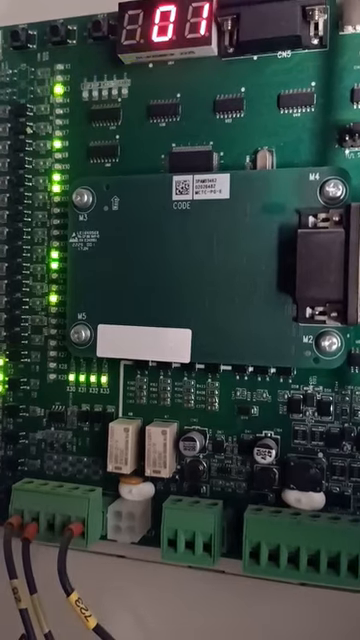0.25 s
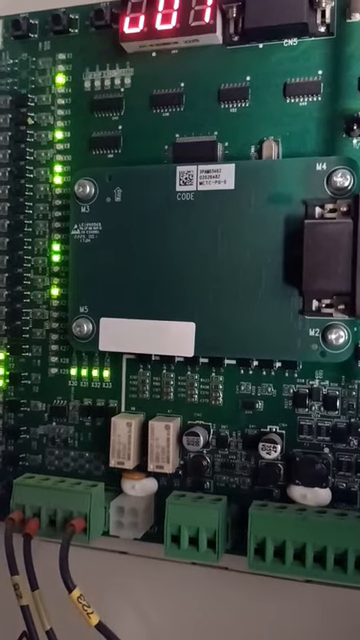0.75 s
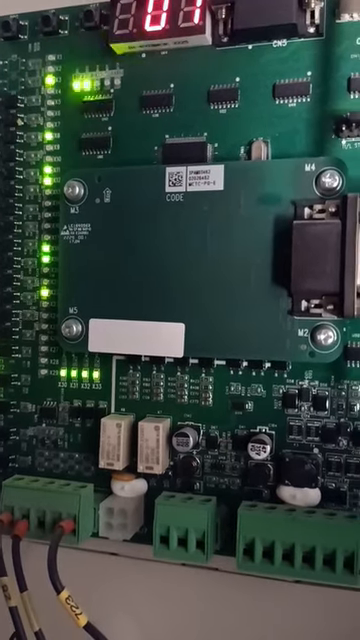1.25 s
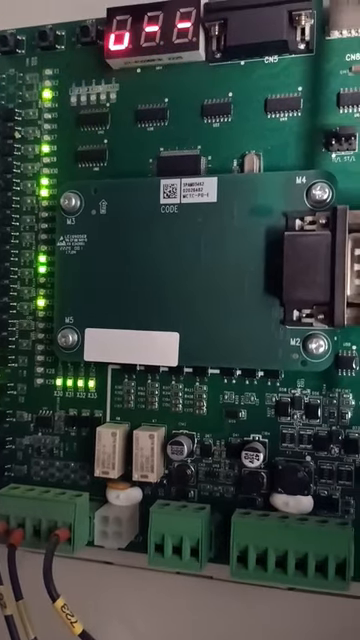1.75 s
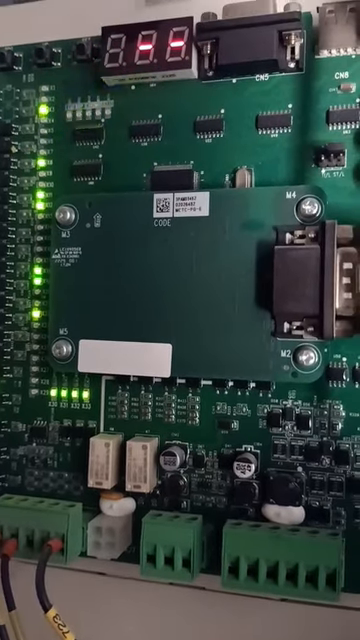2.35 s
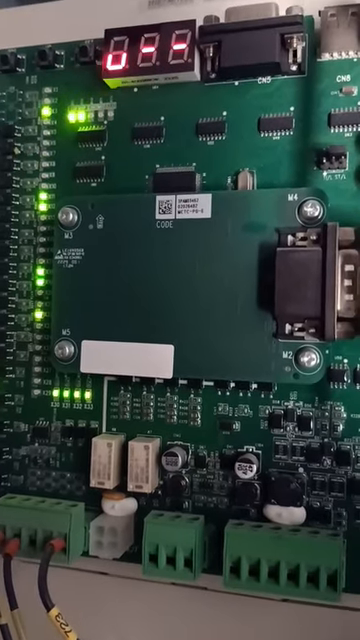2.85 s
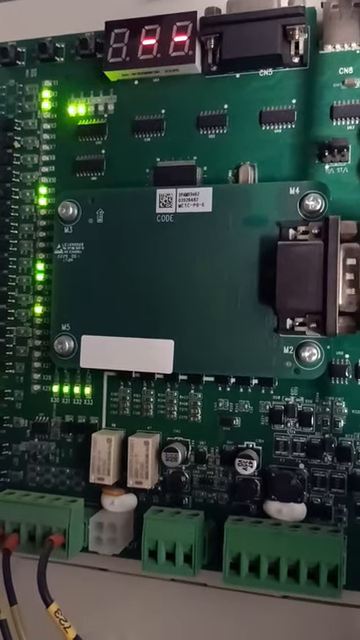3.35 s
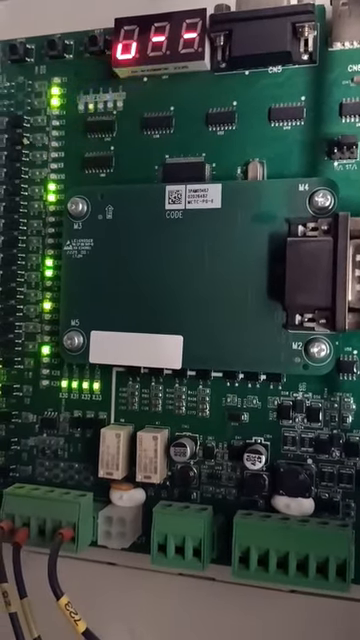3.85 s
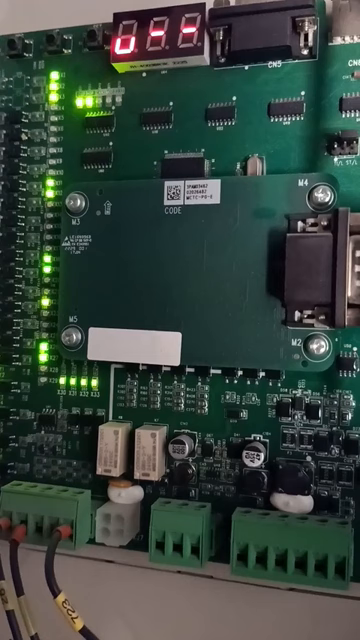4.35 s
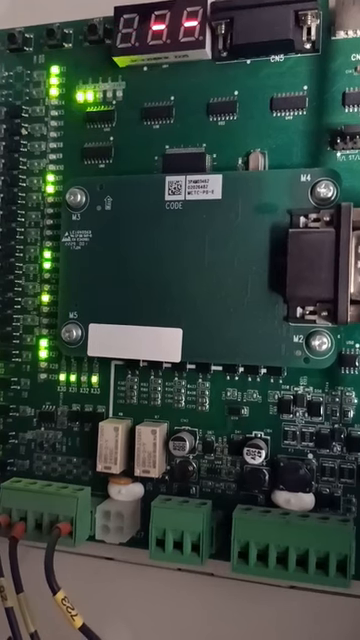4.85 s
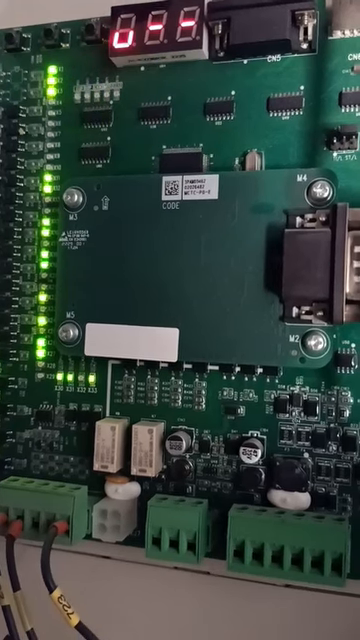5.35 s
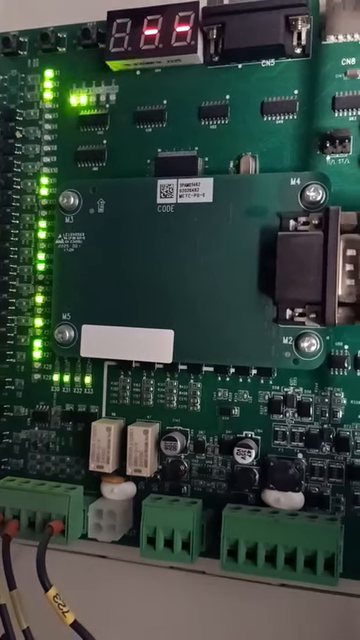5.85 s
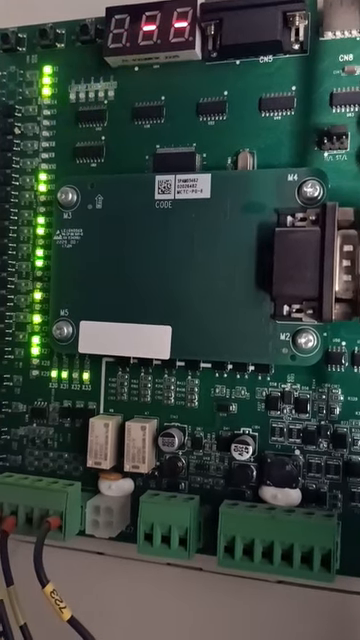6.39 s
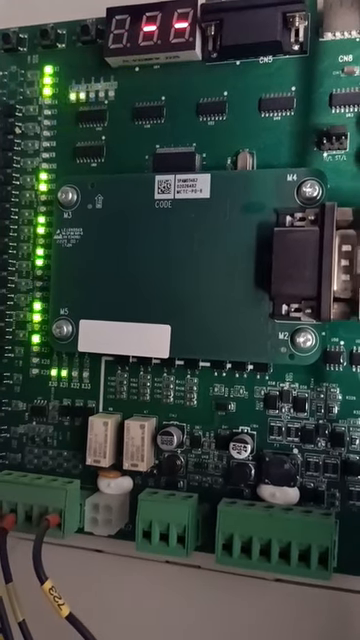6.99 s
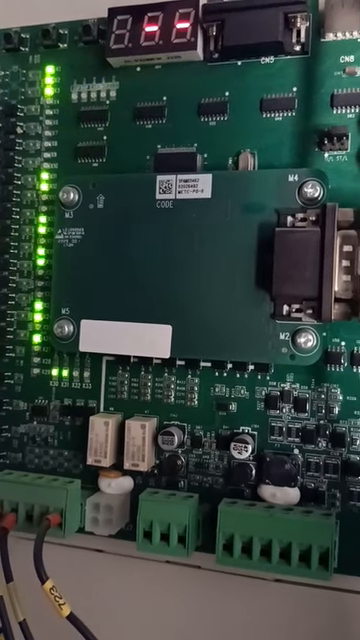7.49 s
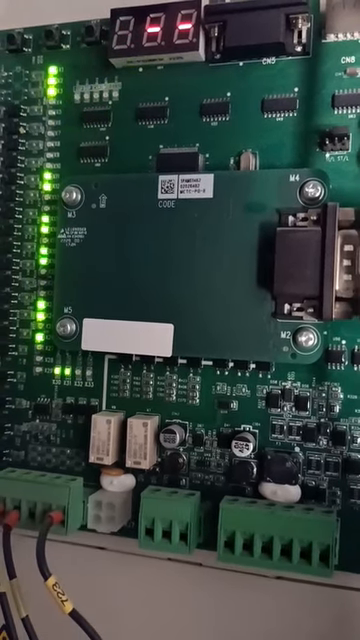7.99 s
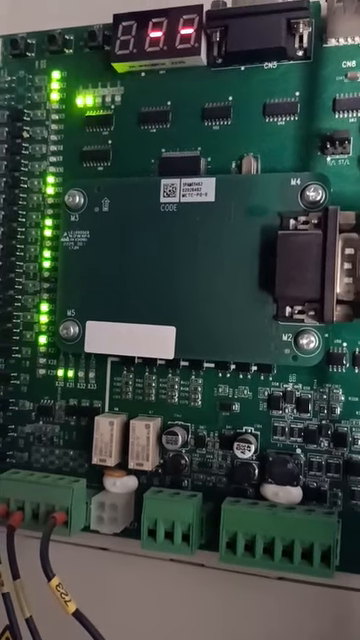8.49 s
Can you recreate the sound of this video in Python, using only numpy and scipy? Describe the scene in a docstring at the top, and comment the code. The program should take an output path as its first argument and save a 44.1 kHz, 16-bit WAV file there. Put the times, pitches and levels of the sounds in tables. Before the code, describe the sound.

Steady cabinet fan noise with a thin high whine and sinking motor hum, faint relay ticks, a sharp double snap with dull clatter, then a heavy metallic clack.

```python
"""A small machine room, close to an open lift controller: fans hum while the inverter whines and the motor stops.
Noise and wavering sines make the fans; sines that follow the motor speed make the whine and the sinking hum.
Relays tick, contactors snap and thud, the brake drops with a dull clatter and the main contactor clacks open after
the drive switches off: noise bursts shaped by a body, plus decaying modes. Rumble, bumps, squeaks and groans lie below."""
import sys
import numpy as np
from scipy import signal
from scipy.fft import rfft, irfft
from scipy.io import wavfile
from scipy.ndimage import uniform_filter1d

SR = 44100
rng = np.random.default_rng(int(sys.argv[2]) if len(sys.argv) > 2 else 0)


def unload_wav(signal):
    """Save mono or channel-first audio to the path in sys.argv[1] as 16-bit WAV at rate SR, clipped to [-1, 1]."""
    wavfile.write(
        sys.argv[1],
        SR,
        np.round(np.clip(np.atleast_2d(signal).T, -1, 1) * 32767).astype(np.int16),
    )


N = 384993
TIME = np.arange(N) / SR
AFTER = TIME[:SR]  # one second after a blow


def undb(db):
    """Decibels to gain."""
    return 10 ** (np.asarray(db) / 20)


def unit(x):
    """Scale to rms 1."""
    return x / np.sqrt(np.mean(x ** 2))


def along(points, hz):
    """Read (frequency [Hz], value) points on a log-frequency axis."""
    f, value = np.transpose(points)
    return np.interp(np.log(hz + 1), np.log(f), value)


def resonances(peaks, hz):
    """Summed bell-shaped boosts, in dB, of (centre [Hz], width [Hz], level [dB]) peaks."""
    return sum(gain_db * np.exp(-2 * ((hz - f) / width) ** 2) for f, width, gain_db in peaks)


def walk(rate):
    """Smooth random wander with a spread near 1, from `rate` fresh values a second."""
    k = int(SR / rate)
    steps = np.repeat(rng.standard_normal(N // k + 1), k)
    smooth = uniform_filter1d(uniform_filter1d(steps, k), k)
    return 1.3 * smooth[:N]


def sides_db(pan_db):
    """Left and right levels in dB; `pan_db` is left minus right."""
    return np.array([[pan_db], [-pan_db]]) / 2


def tone(hz, db, lead=0., pan_db=0.):
    """A sine of given rms whose left side leads the right by `lead` radians."""
    phase = 2 * np.pi * (np.cumsum(hz) / SR + rng.random())
    sides = np.array([[1], [-1]]) / 2
    return np.sqrt(2) * undb(db + pan_db * sides) * np.sin(phase + lead * sides)


def swells(rows, wander_hz, rate, lead):
    """Brief, unsteady tones that rise and fall in bell shapes."""
    out = 0
    for s, length, f, db in rows:
        bell = np.exp(-2 * ((TIME - s) / length) ** 2)
        out = out + tone(f + wander_hz * walk(rate), db, lead) * bell
    return out


def fade(t60):
    """Exponential decay that falls 60 dB in `t60` seconds."""
    return np.exp(-np.log(1000) * AFTER / t60)


def body(colour, size=2048):
    """Causal, minimum-phase response of unit energy with the given spectrum."""
    cepstrum = irfft(np.log(undb(along(colour, np.fft.rfftfreq(size, 1 / SR)))))
    cepstrum[1:size // 2] *= 2
    cepstrum[size // 2 + 1:] = 0
    response = irfft(np.exp(rfft(cepstrum)))
    return response / np.linalg.norm(response)


def blow(colour, t60, room_db, room_t60, rise_s, pan_db, alike_hz=450, damp_hz=1500, treble_t60=0.24):
    """Dense contact chatter through a body, then the room, whose treble has its own decay time."""
    hz = np.fft.rfftfreq(SR, 1 / SR)
    alike = 1 / (1 + (hz / alike_hz) ** 2)  # long waves reach both sides alike
    mid, side = rfft(rng.standard_normal((2, SR))) * np.sqrt([1 + alike, 1 - alike])
    noise = unit(irfft([mid + side, mid - side], SR))
    low = irfft(rfft(noise) / (1 + (hz / damp_hz) ** 4), SR)
    direct = fade(t60) * undb(sides_db(pan_db))
    # the room answers from all sides
    chatter = low * np.hypot(direct, undb(room_db) * fade(room_t60))
    chatter = chatter + (noise - low) * np.hypot(direct, undb(room_db) * fade(treble_t60))
    attack = 1 - np.exp(-AFTER / rise_s)
    return signal.fftconvolve(chatter * attack, body(colour)[None])[:, :SR]


def ring(hz, db, t60, rise_s, lag_s, pan_db=-7.5):
    """One mode that builds up and dies away; the left side's wave lags by `lag_s`."""
    shape = (1 - np.exp(-AFTER / rise_s)) ** 2 * fade(t60)
    wave = np.sin(2 * np.pi * hz * (AFTER - np.array([[lag_s], [0]])))
    return undb(db + sides_db(pan_db)) * shape / shape.max() * wave


def add(out, s, sound):
    """Mix a sound in at time s."""
    start = int(s * SR)
    out[:, start:start + sound.shape[1]] += sound[:, :N - start]


# how the noise reaches the two sides: (frequency [Hz], coherence [0-1], phase by which the left leads [rad])
LIKENESS = [(40, 0.5, -3), (157, 0.97, 1), (406, 1, -0.93), (570, 0.66, 0.5), (806, 1, -1.5),
            (1013, 0.22, -1.5), (1178, 0.1, 5.5), (1305, 0.19, 5), (1544, 0.47, 3), (1953, 0.56, 6),
            (2560, 0.031, 9), (3080, 0.16, 8.5), (4780, 0.084, 15.5), (6100, 0.37, 20.5)]


def stereo_noise(size):
    """White noise whose likeness and phase lead between the sides vary with frequency."""
    hz = np.fft.rfftfreq(size, 1 / SR)
    alike = np.clip(along([row[:2] for row in LIKENESS], hz), 0, 1)
    lead = along([row[::2] for row in LIKENESS], hz)
    mid, side = rfft(rng.standard_normal((2, size))) * np.sqrt([1 + alike, 1 - alike])
    return unit(irfft([(mid + side) * np.exp(1j * lead), mid - side], size))


def rush(colour, peaks=()):
    """Steady noise with a broad spectrum and a few resonances."""
    hz = np.fft.rfftfreq(N, 1 / SR)
    db = along(colour, hz) + resonances(peaks, hz)
    return unit(irfft(rfft(stereo_noise(N)) * undb(db), N))


# broad spectrum of the fan air: (frequency [Hz], level [dB])
AIR_COLOUR = [(25, -52), (60, -23.5), (110, -21.5), (200, -12), (320, -4.5), (520, -14.5), (1100, -7.5),
              (1550, -17), (2000, -16.5), (2600, -17), (4400, -25.5), (6200, -25), (7400, -35),
              (9000, -61.5), (12000, -64.5)]
# cabinet resonances in that air: (centre [Hz], width [Hz], level [dB])
CABINET = [(449, 57, 4), (594, 37, 6.5), (745, 215, 4), (854, 42, -14.5), (986, 14, 3.5), (1140, 110, 1),
           (1500, 25, 6.5), (1813, 390, 6), (2450, 96, 4.5), (3790, 230, 3)]
# blade tones: (frequency [Hz], level [dB], pitch wander [Hz], phase by which the left leads [rad], pitch sag [Hz])
FAN_TONES = [(351, -54.3, 4, -.2, 1), (614, -57, 3.5, .5, 2), (700.5, -60, 4, .2, 0),
             (1033.5, -58, 3, -1.7, 6), (1206, -59.5, 3, 2.2, 8), (1378, -62.5, 3, 1.1, 8),
             (1755, -65, 4, -1.8, 0), (2105, -66, 5, .7, 0), (2326, -67, 5, 1.5, 0)]
FAN_SAG_S = 7.05


def fans(air_db=-44, flutter_db=2.55, flutter_hz=450, blur_db=-5, blur_hz=13):
    """Air rushes through the cabinet, buffeting in the bass; turbulence blurs the blade tones, and some sag late."""
    air = rush(AIR_COLOUR, CABINET) * undb(air_db)
    bass = signal.sosfiltfilt(signal.butter(2, flutter_hz, fs=SR, output="sos"), air)
    out = air + bass * (undb(flutter_db * walk(35)) - 1)
    sagged = np.clip((TIME - FAN_SAG_S) / .2, 0, 1)
    for f, db, wander, lead, sag_hz in FAN_TONES:
        hz = f - sag_hz * sagged
        out += tone(hz + wander * walk(60), db + 3.2 * walk(28), lead)
        # a softer copy wanders wider and blurs the tone
        out += tone(hz + blur_hz * walk(50), db + blur_db + 3 * walk(40), lead)
    return out


# a thin tone that stops with the drive, then a fan overtone that sags from 2412 to 2397 Hz, in two rows:
# (start [s], end [s], frequency [Hz], level [dB], phase by which the left leads [rad])
THIN_TONES = [(0, 6.4, 2684, -62.5, -1), (0, 7.15, 2412, -63, 1.6), (7.15, 9, 2397, -60.5, -.2)]


def thin_tones():
    """Two thin, wavering sines: one stops with the drive; the other, a fan overtone, crossfades to a lower pitch."""
    out = 0
    for start, end, f, db, lead in THIN_TONES:
        present = uniform_filter1d(1. * ((TIME >= start) & (TIME < end)), size=2000)
        out = out + present * tone(f + 3.5 * walk(40), db + 2 * walk(14), lead)
    return out


CRUISE_HZ = 25.5  # electrical frequency at full speed
SLOWDOWN_START_S, SLOWDOWN_LENGTH_S = 2.6, 1.9


def speed():
    """Share of full speed: the lift cruises, then eases to rest along an S-curve."""
    progress = np.clip((TIME - SLOWDOWN_START_S) / SLOWDOWN_LENGTH_S, 0, 1)
    return (1 + np.cos(np.pi * progress)) / 2


def speed_db(power):
    """Level, relative to full speed, of a sound that follows a power of the speed."""
    return 20 * power * np.log10(speed() + 1e-6)


# switching tones: (frequency they close in on [Hz], multiple of the electrical frequency, relative level [dB])
SIDEBANDS = [(6000, -3, 1), (6000, 3, -2), (6000, -1, -13), (6000, 1, -18), (6000, 9, -16),
             (12000, -4, -23), (12000, 4, -26), (9900, -3, -36), (9900, 3, -40), (8100, 0, -36)]
# pitches the motor frame favours or dulls: (frequency [Hz], level [dB])
FRAME = [(5924, 0), (5936, -3), (5948, -11), (6000, -6), (6036, -8), (6050, 4), (6062, 3), (6077, -2)]
CARRIER_HZ = 6000
WHINE_DB, WHINE_POWER = -55, 1.2  # level at full speed, and the power of the speed it follows
# tone at twice the carrier: at full speed, and while the drive holds the motor still until it switches off
DRIVE_RUN_DB, DRIVE_HOLD_DB, DRIVE_OFF_S = -72, -87.5, 6.38


def motor(whine_pan_db=3, carrier_pan_db=-4, fizz_db=-27, fizz_hz=60, holding_db=-15, waver_db=2):
    """Sidebands close in on their centres and fade as the motor slows; a trace stays until the drive is off."""
    hz, whine_db = CRUISE_HZ * speed(), WHINE_DB + speed_db(WHINE_POWER)
    held_db = np.maximum(whine_db, WHINE_DB + holding_db)  # only the group on the carrier lasts at rest
    drive_db = DRIVE_HOLD_DB + (DRIVE_RUN_DB - DRIVE_HOLD_DB) * speed()
    drive_db = drive_db + (2.0 + waver_db * (1 - speed())) * walk(40)  # less steady at rest
    out = tone(np.full(N, 2 * CARRIER_HZ), drive_db, lead=-1.3, pan_db=carrier_pan_db)
    for centre, k, db in SIDEBANDS:
        pitch = centre + k * hz
        if centre == CARRIER_HZ:
            group_db, pan_db = held_db + along(FRAME, pitch), whine_pan_db
        else:
            group_db, pan_db = whine_db, carrier_pan_db
        out += tone(pitch, group_db + db + 0.83 * walk(11), lead=1.0, pan_db=pan_db)
    # a faint fizz surrounds the top tone
    out += tone(2 * CARRIER_HZ + fizz_hz * walk(300), whine_db + fizz_db, pan_db=carrier_pan_db)
    return out * (TIME < DRIVE_OFF_S)


# torque ripple: (multiple of the electrical frequency, relative level [dB])
RIPPLE = [(6, 0), (12, -2)]
# motor mount resonances, which swell the hum as it sinks through them: (centre [Hz], width [Hz], level [dB])
MOUNT = [(101, 43, 12.5), (200, 27, 15)]
HUM_DB, HUM_POWER = -63.5, 1.9  # level at full speed before the mount, and the power of the speed it follows


def windings(rough_db=4):
    """Torque ripple hums unsteadily and sinks in pitch and level as the motor slows."""
    out = 0
    for k, db in RIPPLE:
        hz = k * CRUISE_HZ * speed()
        unsteady_hz = hz + 7 * walk(60)
        level_db = HUM_DB + db + speed_db(HUM_POWER) + resonances(MOUNT, hz)
        out = out + tone(unsteady_hz, level_db + rough_db * walk(30.12))
    return out


# spectrum of the travel rumble: (frequency [Hz], level [dB])
RUMBLE_COLOUR = [(25, -20.5), (60, -21), (105, -3), (190, -2), (260, -3.5), (500, -1), (1500, -6),
                 (2700, -6), (4000, -28), (8000, -84)]
RUMBLE_DB, RUMBLE_POWER = -49, 0.19  # level at full speed, and the power of the speed it follows


def travel():
    """The moving lift rumbles in quick flutters and slower surges, sinking to a trace once it stands."""
    surge_db = 2 * walk(30) + 1.1 * walk(9)
    return rush(RUMBLE_COLOUR) * undb(RUMBLE_DB + speed_db(RUMBLE_POWER) + surge_db)


# soft low bumps: (time [s], level [dB], decay t60 [s])
BUMPS = [(0.569, -57, 0.17), (.76, -54, .2), (1.04, -53, .2), (5.64, -48.5, 0.18), (6.819, -54, 0.24),
         (7.48, -42.5, 0.16), (7.93, -54, 0.41), (8.0, -59, 0.28), (8.3, -50, 0.18)]
# their spectrum: (frequency [Hz], level [dB])
BUMP_COLOUR = [(25, 0), (55, 3.5), (85, 16), (130, 13), (250, -45), (1000, -64)]


def bumps():
    """Soft low thuds: noise bursts through a bass-heavy body."""
    out = np.zeros((2, N))
    for s, db, t60 in BUMPS:
        thud = blow(BUMP_COLOUR, t60, room_db=-23, room_t60=.6, rise_s=0.0027, pan_db=4)
        add(out, s, undb(db) * thud)
    return out


# faint squeaks: (time of the peak [s], length [s], frequency [Hz], level [dB])
SQUEAKS = [(2.52, .05, 2690, -56), (3.372, 0.07, 2680, -49.5), (4.17, 0.14, 2675, -58),
           (5.239, 0.091, 3600, -62), (5.878, .06, 3760, -62), (7.35, 0.083, 3610, -61)]


def squeaks():
    """Brief, faint squeaks: sines with an unsteady pitch."""
    return swells(SQUEAKS, wander_hz=16, rate=100, lead=1.3)


# groans of the motor mount: (time of the peak [s], length [s], frequency [Hz], level [dB])
GROANS = [(3.45, 0.093, 200, -52), (3.47, .1, 107, -52.5), (3.63, .07, 80, -62)]


def groans():
    """The motor mount groans on after the sinking hum has passed through its resonances."""
    return swells(GROANS, wander_hz=5.9, rate=60, lead=0)


# relay ticks, and the bright onset of the main contactor's clack in the rows at 6.7786 and 6.7805:
# (time [s], level [dB], decay t60 [s], ping [Hz], spring [Hz], spring level relative to the tick [dB],
#  upper spring [Hz])
TICKS = [(3.587, -32.5, 0.037, 2650, 2666, -5, 6030), (3.595, -35, 0.028, 2620, 2900, -16, 6309),
         (3.780, -34, 0.048, 2810, 2670, -15, 6230), (4.007, -33, 0.055, 3080, 2740, -8, 5650),
         (4.016, -35, 0.04, 2150, 2412, -10, 5981), (4.146, -38, 0.032, 2350, 3790, -13, 6000),
         (5.369, -23.5, 0.017, 2450, 2630, -18, 5580), (6.7003, -39.5, 0.021, 5840, 2630, -18, 6400),
         (6.757, -26.5, 0.0187, 2240, 2310, -20, 6250), (6.7786, -19.5, 0.057, 3930, 2630, -20, 6020),
         (6.7805, -23, 0.063, 3430, 2190, -15, 6300), (7.171, -33, 0.037, 2180, 2270, -9, 6331)]
# their spectrum: (frequency [Hz], level [dB])
TICK_COLOUR = [(500, -64), (1700, -4.5), (2600, 6), (3400, -8), (5000, -7.5), (6300, -5.5), (8000, -17),
               (10000, -24), (12000, -28), (15500, -27)]
SPRING_T60_S, UPPER_SPRING_DB = 0.09, -18  # upper spring level is relative to the tick


def ticks(ping_db=-7, bounce_share=.07, bounce_db=-3, detune=0.024):
    """Relay ticks, and the bright onset of the main clack: springs ring and armatures bounce with short pings.
    The shorter the tick, the sharper its attack and the quicker its bounces."""
    out = np.zeros((2, N))
    rise_share, ping_share = .035, .22  # of the tick's t60
    for s, db, t60, hz, spring_hz, spring_db, upper_hz in TICKS:
        rise_s = rise_share * t60
        tick = blow(TICK_COLOUR, t60, room_db=-14.0, room_t60=.2, rise_s=rise_s, pan_db=-1.5)
        add(out, s, undb(db) * tick)
        for f, gain_db in [(spring_hz, spring_db), (upper_hz, UPPER_SPRING_DB)]:
            add(out, s, ring(f, db + gain_db, SPRING_T60_S, rise_s, lag_s=0, pan_db=-3))
        for k, (late, sharp, hard) in enumerate(rng.uniform(-0.99, 1, size=(4, 3))):
            level_db = db + ping_db + k * bounce_db + 2 * hard
            ping = ring(hz * (1 + detune * sharp), level_db, ping_share * t60, rise_s, lag_s=0, pan_db=-1)
            add(out, s + bounce_share * t60 * (k + .5 + late / 2), ping)
    return out


# contactor snaps and their rebounds: (time [s], rattle level [dB], armature ring [Hz], ring level [dB],
#                                      ring t60 [s], overtone level [dB], thud level [dB])
SNAPS = [(5.3750, -18.5, 1870, -6.8, .006, -19.5, -45), (5.3795, -36, 2400, -23, .012, -40, -52),
         (5.4650, -18.5, 2590, -9.8, .011, -29, -24), (5.5003, -40, 2600, -21, .009, -40, -55)]
# spectrum of the rattle: (frequency [Hz], level [dB])
SNAP_COLOUR = [(150, -39), (430, -5), (800, -15), (1300, 0), (1900, 1), (2700, 4), (3400, -10),
               (4600, -15.5), (5800, -10), (7000, -32), (9500, -38), (12000, -35), (15500, -46)]
# the bright crack of metal on metal: (frequency [Hz], level [dB])
CRACK_COLOUR = [(300, -12), (1500, 8.5), (3000, 10), (6000, 6), (8000, -9), (10000, -19), (15500, -21)]
# housing modes: (frequency [Hz], level relative to the rattle before the falloff [dB], decay t60 [s])
HOUSING = [(1810, -18, 0.17), (1870, -18, 0.24), (2430, -20, .16), (2550, -10, 0.17), (2631, -18, 0.18),
           (2900, -21, .14), (3100, -16, .13)]
# loose parts clatter after a snap: first one (relative to the rattle), spacing, fall from one to the next
LOOSE_DB, LOOSE_GAP_S, LOOSE_FALL_DB = -6, .009, -2


def contactors(overtone_hz=5620, crack_db=3, thud_hz=430, falloff_db_per_octave=-22):
    """Each armature cracks against its stop, rings for a few cycles and rattles its housing,
    whose modes nearest to that ring sound on; the mounting plate thuds a moment later."""
    out = np.zeros((2, N))
    build_s, lag_s, rise_s, pan_db = .004, .00036, .0012, -1
    for s, db, hz, ring_db, t60, overtone_db, thud_db in SNAPS:
        rattle = blow(SNAP_COLOUR, t60=.055, room_db=-8.5, room_t60=.3, rise_s=rise_s, pan_db=pan_db)
        crack = blow(CRACK_COLOUR, t60=.018, room_db=-40, room_t60=.2, rise_s=rise_s, pan_db=pan_db)
        add(out, s, undb(db) * (rattle + undb(crack_db) * crack))
        add(out, s, ring(hz, ring_db, t60, build_s, lag_s, pan_db=-4))
        add(out, s, ring(overtone_hz, overtone_db, 0.0087, build_s, lag_s, pan_db=-2))
        add(out, s + build_s, ring(thud_hz, thud_db, 0.012, build_s, lag_s=0, pan_db=-3))
        for k, late in enumerate(rng.random(size=4)):
            clatter = blow(SNAP_COLOUR, t60=.014, room_db=-40, room_t60=.2, rise_s=.0003, pan_db=0)
            clatter_db = db + LOOSE_DB + k * LOOSE_FALL_DB
            add(out, s + LOOSE_GAP_S * (k + 1 + late), undb(clatter_db) * clatter)
        for mode_hz, mode_db, mode_t60 in HOUSING:
            strength_db = db + mode_db + falloff_db_per_octave * abs(np.log2(mode_hz / hz))
            lag = rng.random() / mode_hz  # up to one cycle
            add(out, s, ring(mode_hz, strength_db, mode_t60, build_s, lag_s=lag, pan_db=3))
    return out


# dull thuds, the second contactor's first, then the brake shoes landing: (time [s], level [dB], decay t60 [s])
DULL_THUDS = [(5.467, -21.5, .025), (5.515, -26, .05), (5.5205, -25, .09), (5.537, -28, .04),
              (5.552, -25.5, .06), (5.5745, -24, .05)]
# their spectrum: (frequency [Hz], level [dB])
DULL_COLOUR = [(60, -34), (110, -17), (150, -13.5), (270, -6.5), (340, -12), (480, -3.5), (700, -3),
               (1150, -6), (1280, -5), (1400, -3), (1560, -21.5), (2500, -14), (4000, -56), (9000, -72)]
# panels that the brake sets ringing: (frequency [Hz], level [dB], decay t60 [s])
BRAKE_MODES = [(151, -40, .4), (272, -39.5, .45), (538, -37, .25), (641, -33.5, .3), (807, -37, .35),
               (947, -32, .3), (1120, -39, .3), (1335, -35, .27), (1380, -29, .27), (1402, -21.5, .055)]


def dull_thuds():
    """The second contactor's thud, then the brake shoes landing in a quick clatter that sets panels ringing."""
    out = np.zeros((2, N))
    for s, db, t60 in DULL_THUDS:
        thud = blow(DULL_COLOUR, t60, room_db=-14, room_t60=.5, rise_s=.002, pan_db=1)
        add(out, s, undb(db) * thud)
    panels_start_s = DULL_THUDS[2][0]  # with the second landing of the shoes
    for hz, db, t60 in BRAKE_MODES:
        add(out, panels_start_s, ring(hz, db, t60, rise_s=0.0055, lag_s=0, pan_db=2.5))
    return out


# main contactor opening, with its rebounds: (time [s], level [dB], decay t60 [s])
MAIN = [(6.7835, -15, 0.04), (6.7908, -22.5, 0.04), (6.7995, -26, 0.045), (6.8085, -26, .035),
        (6.836, -30.5, 0.025), (6.848, -31, .022)]
# its spectrum: (frequency [Hz], level [dB])
MAIN_COLOUR = [(70, -34), (250, -14), (400, -3), (490, -10), (600, -3), (760, 1), (1000, 6), (1220, 4),
               (1550, -15), (2100, -1), (3000, -14), (6200, -15), (8500, -33), (15000, -36)]
# its frame modes: (frequency [Hz], level [dB], decay t60 [s], left minus right [dB])
MAIN_MODES = [(411, -31, .22, -4), (575, -34, .28, 2), (746, -33, .19, -2), (824, -24, .055, -1),
              (882, -32, .55, -1), (945, -36, .6, -1), (1001, -24, .2, 0), (1090, -27, .06, -2),
              (1137, -33, .33, -4), (1174, -30, .17, -5), (1265, -36, .25, -2), (1610, -37, .13, -3),
              (2164, -29, .09, -4)]
# armature knock at each blow: pitch, level relative to the blow, length
KNOCK_HZ, KNOCK_DB, KNOCK_T60_S = 1050, -3, .011


def main_contactor(build_s=0.0018):
    """The heavy part of the clack: quick rebounds, each with an armature knock; the first leaves the frame ringing."""
    out = np.zeros((2, N))
    pan_db, knock_rise_s = -3, .004
    for s, db, t60 in MAIN:
        clack = blow(MAIN_COLOUR, t60, room_db=-19.5, room_t60=1.0, rise_s=0.00014, pan_db=pan_db)
        add(out, s, undb(db) * clack)
        add(out, s, ring(KNOCK_HZ, db + KNOCK_DB, KNOCK_T60_S, knock_rise_s, lag_s=0, pan_db=pan_db))
    for hz, db, t60, mode_pan_db in MAIN_MODES:
        add(out, MAIN[0][0], ring(hz, db, t60, build_s, lag_s=0.00016, pan_db=mode_pan_db))
    return out


def scene():
    """Everything heard in front of the cabinet."""
    steady = fans() + thin_tones() + motor() + windings() + travel()
    small = bumps() + squeaks() + groans() + ticks()
    return steady + small + contactors() + dull_thuds() + main_contactor()


def record(dry, shade_db=-5, shade_hz=8000, top_hz=15600):
    """The left side is a little duller in the treble, and a steep low-pass cuts the top."""
    treble = signal.sosfiltfilt(signal.butter(2, shade_hz, "high", fs=SR, output="sos"), dry)
    shaded = dry + treble * (undb(np.array([[shade_db], [0]])) - 1)
    return signal.sosfiltfilt(signal.ellip(8, .05, 60, top_hz, fs=SR, output="sos"), shaded)


dry = scene()
out = record(dry)
unload_wav(out)
```